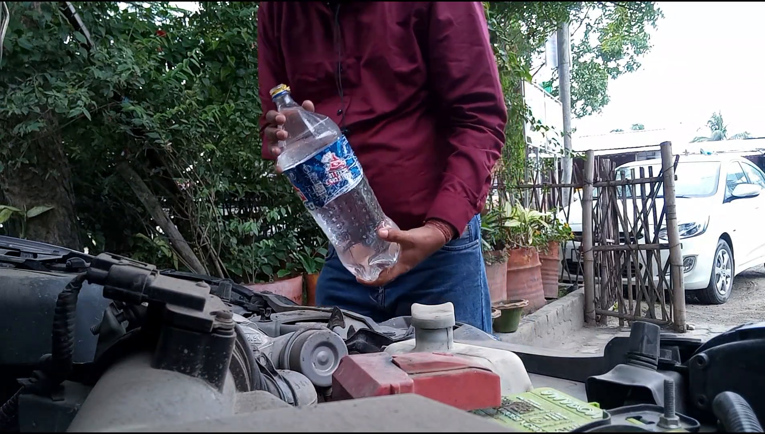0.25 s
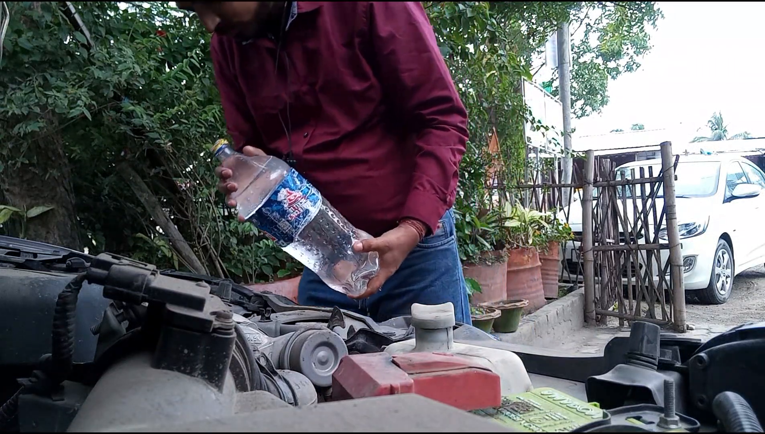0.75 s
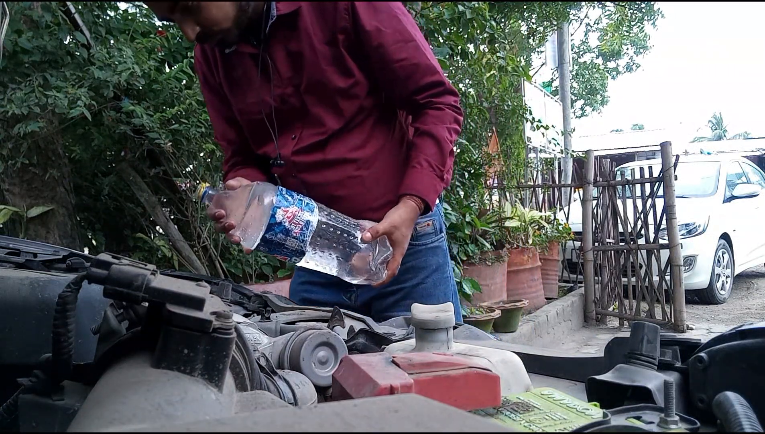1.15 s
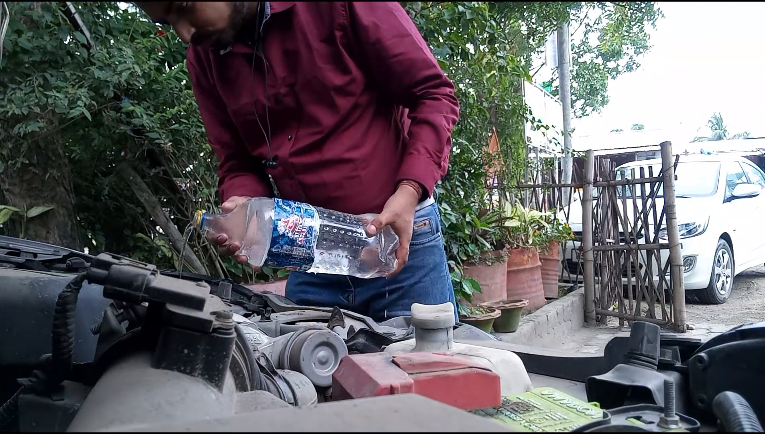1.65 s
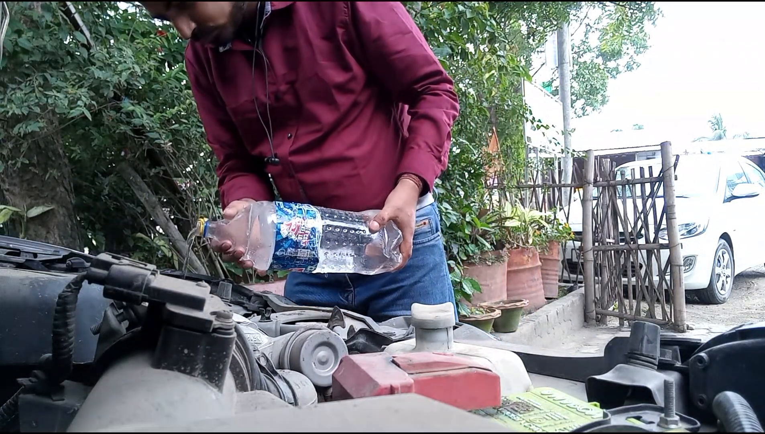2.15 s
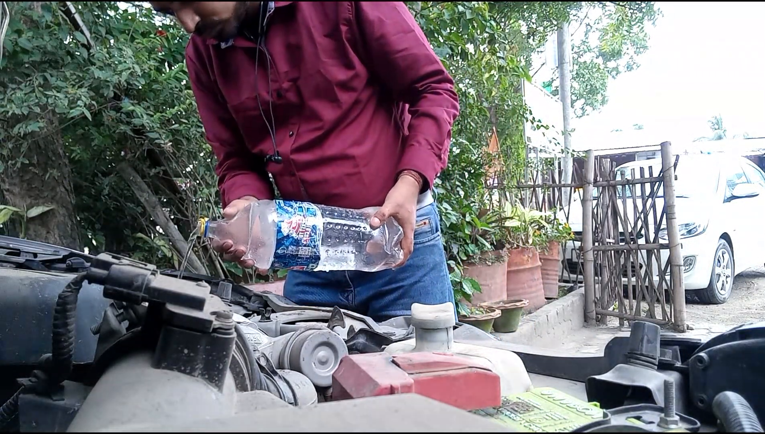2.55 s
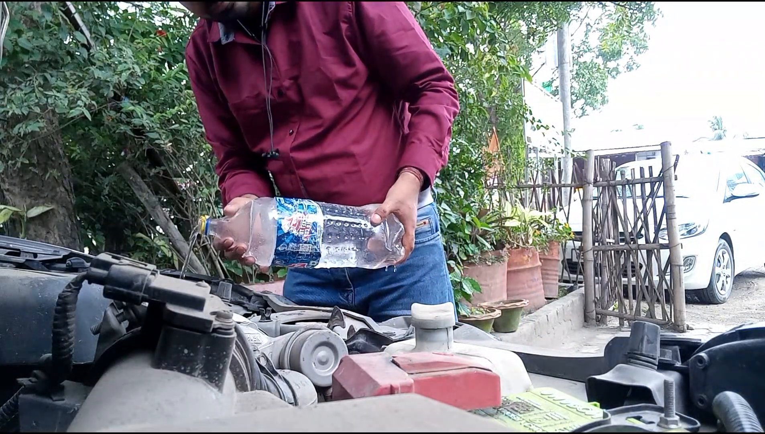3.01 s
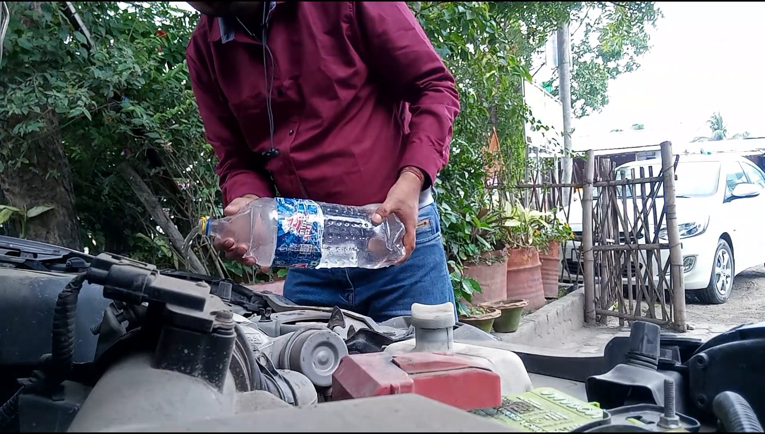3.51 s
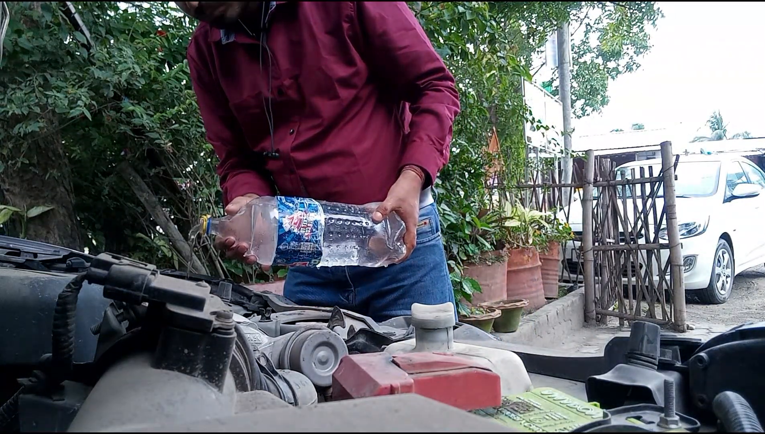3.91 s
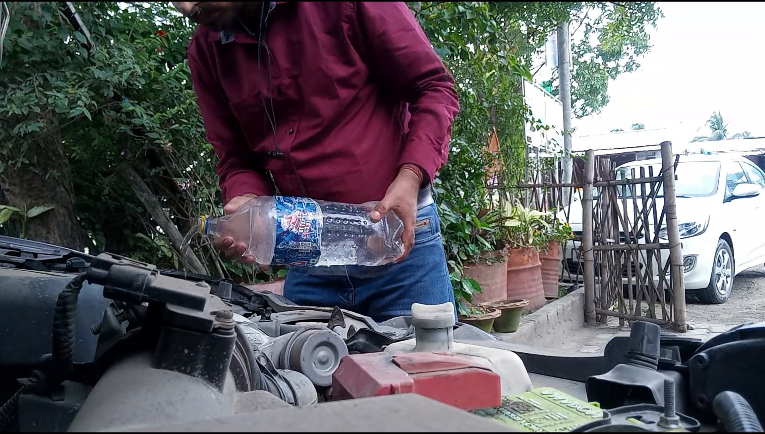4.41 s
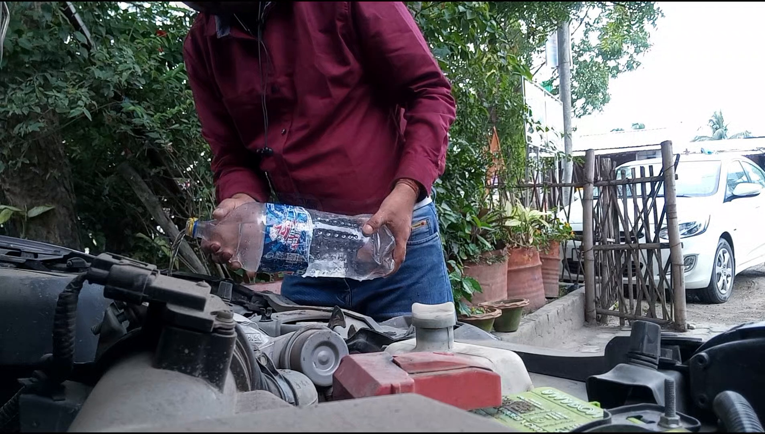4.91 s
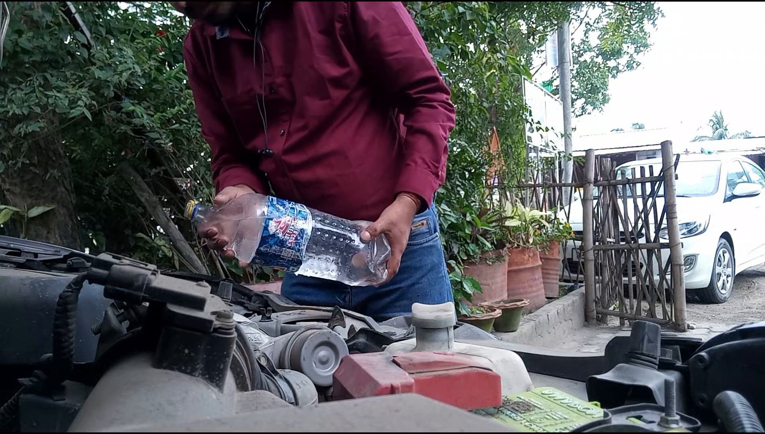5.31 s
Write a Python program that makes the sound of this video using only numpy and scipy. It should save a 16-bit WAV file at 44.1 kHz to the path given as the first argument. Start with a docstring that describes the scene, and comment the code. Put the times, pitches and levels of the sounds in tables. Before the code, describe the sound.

After two quiet garden seconds, hollow bottle glugs, plips and a hard low splash build, then thin out beneath loud bird chirps.

```python
"""Glugging water in a garden

Water glugs unevenly from a plastic bottle into a car's reservoir: air gulps ring the bottle's cavity as pitched
bubbles, short bubbles plip, a few low ones slosh or thump, drops tick, slugs splash as noise bursts through the
reservoir's air modes. Birds whistle and chirp among trees as sliding tones with echoes; insects sing high as
bands of patchy noise. Filtered noise makes the garden's rush and the puffs of wind that brush the microphone."""
import sys
import numpy as np
from scipy import signal
from scipy.fft import rfft, irfft, next_fast_len
from scipy.io import wavfile
from scipy.ndimage import uniform_filter1d, map_coordinates

SR = 44100
rng = np.random.default_rng(int(sys.argv[2]) if len(sys.argv) > 2 else 0)


def bounce(signal):
    """Save signal as a 16-bit WAV file at the path given by the first command-line argument."""
    frames = np.transpose(np.atleast_2d(signal))
    limited = np.clip(frames, -1, 1)
    pcm = np.round(limited * 32767).astype(np.int16)
    wavfile.write(sys.argv[1], SR, pcm)


N = 245284

# garden rush: (time [s], rumble level before gain [dB], treble level before gain [dB])
RUSH = [(0, -79.5, -84.5), (.53, -77.5, -87), (.57, -78.5, -89), (.9, -81, -90.5), (.94, -78.5, -84),
        (1.3, -79, -83.5), (2.4, -82, -90), (3.5, -79, -83), (4.7, -84.5, -82.5), (5.2, -80, -85),
        (5.56, -82, -85.5)]
# garden rush spectrum: (frequency [Hz], relative density [dB])
RUSH_SPECTRUM = [(20, -34), (55, -13), (95, -4.5), (200, -10), (500, -10), (1100, -15), (2100, -9.5),
                 (3400, -9.5), (4400, -14), (5000, -20), (7800, -23), (9700, -24), (10100, -51),
                 (15500, -41.5)]
# wind on the microphone: (middle [s], 1/e width [s], level [dB])
WIND_PUFFS = [(.75, 0.19, -53), (2.79, 0.14, -82), (3.57, 0.028, -63.5), (4.41, 0.13, -76),
              (5.22, .09, -68.5)]
# wind spectrum: (frequency [Hz], relative density [dB])
WIND_SPECTRUM = [(12, -48.5), (20, -3.5), (38, -26), (82, 11.5), (100, -0.5), (140, -22.5), (250, -36),
                 (320, -67), (550, -120)]
# insect choruses: (centre [Hz], width [Hz], resting level [dB], bouts as (middle [s], 1/e width [s], level [dB]))
CHORUSES = [(5667, 330, -79, [(.28, 0.19, -87), (2.8, 0.95, -82), (3.2, 0.24, -79), (3.6, .2, -89),
            (4.0, 0.68, -87)]), (6560, 135.4, -91, [(.3, 0.32, -76.5), (2.0, 0.38, -71.5), (3.1, 0.1, -74),
            (3.75, 0.24, -75.5), (4.55, 0.51, -75.5)]), (7183, 500, -96, [(0, 0.6, -70), (.65, 0.39, -77),
            (1.45, .35, -70), (3.06, .15, -74), (3.5, 0.44, -89), (5.1, 0.91, -81)]),
            (8780, 1330, -72.5, [(.25, 0.86, -72.5), (1.45, 0.53, -69), (2.5, 1, -80.5), (5.56, 0.1, -73)])]
# far bird's calls: (time [s], level [dB])
FAR_CALLS = [(.2, -66.5), (1.549, -69)]
# far bird's phrase: (delay [s], length [s], from [Hz], to [Hz], slide time constant [s], level re call [dB])
FAR_PHRASE = [(0, .2, 1520, 1401, 0.086, -0.5), (0.193, 0.13, 1370, 1508, 0.071, 0.5),
              (0.286, 0.11, 1510, 1673, 0.0207, -1.5)]
# clear whistles, with two lone low notes of the far bird among them (at 1.0 s and 3.03 s): (time [s], length
# [s], from [Hz], to [Hz], slide time constant [s], level [dB])
WHISTLES = [(1.0, 0.45, 1494, 1404, 0.103, -75), (.73, 0.093, 1950, 1936, 0.09, -63),
            (1.19, 0.092, 3230, 3386, 0.12, -53.5), (1.82, 0.081, 4465, 4623, 0.066, -61.5),
            (2.31, 0.135, 3506, 3820, 0.051, -61.5), (3.03, 0.26, 1472, 1428, 0.022, -55.5),
            (4.33, 0.3, 2470, 2489, 0.034, -62.5), (4.9, 0.085, 2760, 2227, 0.024, -45.5),
            (4.99, 0.044, 1930, 1925, 0.026, -52), (5.12, 0.17, 2500, 2506, 0.04, -59.5),
            (5.22, 0.14, 2457, 2525, 0.039, -52), (5.29, 0.056, 1970, 1773, 0.032, -52.5),
            (5.41, 0.12, 2490, 2550, .05, -69)]
# buzzy chirps: (time [s], length [s], from [Hz], to [Hz], slide time constant [s], level [dB])
BUZZY_CHIRPS = [(.55, 0.024, 2830, 3260, 0.032, -62), (.6, 0.063, 3845, 3750, 0.044, -65.5),
                (.71, 0.056, 3850, 3780, .03, -64.5), (.76, .07, 3210, 3240, .04, -65.5),
                (.96, 0.055, 2940, 2640, 0.044, -57), (.97, 0.24, 2560, 2423, 0.026, -65),
                (1.08, 0.076, 2730, 2380, .05, -58), (1.79, 0.085, 3780, 3630, 0.023, -52),
                (1.83, 0.18, 3380, 3270, 0.038, -67), (2.02, 0.11, 3600, 4340, 0.026, -54),
                (2.16, 0.18, 3780, 3525, 0.038, -58), (2.5, 0.19, 5500, 5240, 0.11, -72),
                (2.66, 0.11, 4650, 4283, 0.052, -57.5), (2.77, 0.1, 4200, 3481, 0.12, -55),
                (3.44, 0.17, 3636, 3910, 0.055, -53.5), (4.13, .04, 3150, 3150, 0.036, -68),
                (4.19, 0.54, 3302, 3170, 0.038, -60.5), (4.36, 0.094, 3690, 3700, 0.058, -48),
                (4.37, 0.2, 3180, 3213, 0.051, -51), (4.4, 0.053, 4330, 4440, 0.033, -56),
                (4.55, 0.088, 3006, 3944, 0.043, -41), (4.57, 0.062, 3300, 2880, 0.034, -44),
                (4.57, 0.099, 2854, 2090, 0.043, -47), (4.765, 0.085, 2860, 3850, 0.03, -45.5),
                (4.815, .13, 3800, 3795, 0.031, -37.5), (4.85, 0.054, 3620, 2530, 0.028, -46),
                (4.86, .1, 3284, 3140, 0.028, -51.5), (4.96, 0.15, 4494, 4420, 0.041, -65),
                (4.98, 0.11, 3750, 3800, 0.054, -56), (4.99, .06, 4850, 5340, .04, -59),
                (5.095, 0.08, 3060, 3740, 0.036, -42), (5.14, 0.15, 3785, 3807, 0.039, -47),
                (5.14, 0.059, 4740, 4970, 0.021, -66), (5.2, 0.15, 2950, 2076, .08, -58.5),
                (5.29, 0.14, 3810, 3700, 0.073, -54.5), (5.42, 0.12, 4010, 3004, 0.13, -50.5)]
# air gulps: (envelope peak time [s], level [dB], cavity pitch [Hz], length before the rise cap [s])
AIR_GULPS = [(2.067, -38, 434, 0.011), (2.094, -48, 440, 0.0073), (2.112, -41, 438, 0.011),
             (2.431, -45.5, 465, 0.0055), (2.472, -43, 483.6, 0.04), (2.498, -45.5, 503.5, 0.018),
             (2.574, -32.5, 476, 0.029), (2.603, -37.5, 475, 0.0073), (2.618, -40.5, 496, 0.019),
             (2.648, -44.5, 501, 0.041), (2.775, -51.5, 460.6, 0.049), (2.815, -30.5, 476, .026),
             (2.845, -38, 493.1, 0.029), (2.885, -35.5, 508.3, 0.018), (2.91, -40, 508.2, 0.017),
             (3.006, -38.5, 444, 0.014), (3.05, -48.5, 457, 0.0046), (3.187, -44, 454.7, 0.016),
             (3.213, -26.5, 464.3, .014), (3.232, -26.5, 470.2, 0.015), (3.264, -39.5, 484.3, 0.04),
             (3.318, -45, 424, 0.008), (3.345, -41.5, 456, 0.054), (3.39, -34, 441.6, 0.027),
             (3.447, -43, 477.7, 0.02), (3.468, -34, 450, 0.012), (3.499, -35, 424.4, 0.029),
             (3.532, -42, 414.3, 0.025), (3.568, -11, 456, 0.0073), (3.602, -36.5, 447.2, 0.015),
             (3.647, -41.5, 494, 0.015), (3.716, -33.5, 427.8, 0.059), (3.78, -22.5, 432, 0.0056),
             (3.792, -19.5, 419, 0.0075), (3.805, -39.5, 417, 0.017), (3.87, -30.5, 453, 0.0054),
             (3.883, -29.5, 424, 0.012), (3.896, -29, 493, 0.02), (3.912, -29.5, 437.3, 0.023),
             (4.02, -40.5, 435.8, 0.037), (4.093, -39, 452, 0.019), (4.179, -25, 455, 0.012),
             (4.204, -32.5, 448.5, 0.014), (4.266, -32, 493.4, 0.016), (4.24, -46, 484, 0.02),
             (4.295, -46, 493, 0.025), (4.33, -44, 477.5, .025), (4.458, -43.5, 528, 0.025),
             (4.489, -39, 517.6, 0.035), (4.637, -35, 560, 0.0088), (4.671, -26.5, 533.6, 0.012),
             (4.893, -42, 524, 0.008), (4.906, -40.5, 648, 0.011), (4.959, -42, 610, 0.0053),
             (5.53, -34.5, 434, 0.017), (5.545, -37, 470, 0.0049)]
# short bubbles, slosh blips and a low thump: (envelope peak time [s], level [dB], pitch [Hz])
SHORT_BUBBLES = [(.335, -60, 650), (.425, -59, 349), (.52, -63, 560), (.655, -62.5, 993),
                 (2.207, -46, 1081), (2.432, -54, 1674), (2.574, -52.5, 1610), (2.647, -53.5, 2000),
                 (2.701, -57, 4490), (2.73, -56, 1610), (2.759, -55, 1064), (2.77, -49.5, 5770),
                 (2.776, -58.5, 2380), (2.843, -42, 1660), (2.912, -49, 1587), (2.944, -45, 1070),
                 (2.946, -50, 1650), (2.96, -52.5, 5800), (3.128, -49.5, 1610), (3.187, -54, 5220),
                 (3.195, -49.5, 1050), (3.208, -37.5, 1690), (3.21, -43, 2092), (3.2255, -41, 3775),
                 (3.255, -49, 1540), (3.316, -46, 3093), (3.333, -45, 1640), (3.396, -52, 1540),
                 (3.4, -38.5, 1067), (3.538, -46, 1090), (3.567, -25, 953), (3.568, -46, 4290),
                 (3.581, -42.5, 1630), (3.582, -39, 1015), (3.595, -49, 1680), (3.621, -48, 4300),
                 (3.701, -49, 1299), (3.728, -44, 1090), (3.787, -45, 3834), (3.797, -45, 977),
                 (3.8051, -42, 5980), (3.814, -48, 920), (3.877, -42.5, 1643), (3.91, -46, 1260),
                 (3.908, -43.5, 1530), (3.912, -50, 3030), (3.954, -45, 2705), (3.994, -53.5, 4006),
                 (4.001, -51, 1674), (4.069, -37.5, 1020), (4.145, -46.5, 3150), (4.188, -38.5, 1030),
                 (4.21, -48, 1185), (4.227, -47.5, 985), (4.303, -45, 3266), (4.315, -46.5, 1705),
                 (4.384, -49, 1328), (4.482, -43.5, 1844), (4.663, -38, 1363), (4.665, -44, 1167),
                 (4.68, -53, 1486), (4.871, -52.5, 2050), (4.891, -50, 1646), (5.014, -52.5, 1943),
                 (5.039, -57.5, 1400), (5.101, -50.5, 1600), (5.2, -59.5, 218.7)]
# slugs of water landing: (time [s], level [dB], low body trim [dB], reservoir ring trim [dB])
SLUGS = [(0.6484, -68, 2, -2), (2.0506, -67, 8.5, 1.5), (2.0935, -58, -1, -9), (2.4294, -83, -3, 4.5),
         (2.847, -63, -21, -11), (3.1798, -62, -24, -6), (3.2104, -63.5, -23, 9.5), (3.3256, -65, -19, 9.5),
         (3.3894, -71, 8, -19), (3.5619, -40.5, 15.5, -12.5), (3.589, -59.5, -2, -2),
         (3.6177, -52, -18, -26), (3.703, -62, -15, -0.5), (3.792, -42, -0.5, -39), (3.822, -57, 0, -11),
         (3.9097, -63, -2, -2), (3.993, -61, -5, -0.5), (4.1788, -60, 2, -5.5), (4.3174, -71, 2, 3.5),
         (4.4754, -72, 8, 10), (4.6459, -73, 6, 18.5), (4.6712, -74, 8, 14), (4.887, -62.5, 14.5, 1),
         (4.9556, -61, 6, -8), (5.188, -65, 6, -14)]
# reservoir air modes: (frequency [Hz], half-power width [Hz], level [dB])
AIR_MODES = [(1081, 36, 2), (1628, 200, 1), (2310, 2700, -15.5), (3137, 110, -0.5), (3860, 76, -3),
             (4396, 81, -4), (6100, 400, -23.5), (6440, 430, -16)]
# drop ticks: (time [s], level before layer gains [dB], bead pitch [Hz], mist trim [dB])
DROP_TICKS = [(1.7816, -41, 7140, -22), (2.285, -47, 7070, -9), (2.4143, -47.5, 8600, -40),
              (2.52, -45, 8670, -35), (2.765, -54, 7800, -40), (2.8593, -52, 8150, -24),
              (2.923, -51, 7080, -25.5), (3.0034, -43, 7430, -30.5), (3.1485, -51.5, 7110, -22),
              (3.2305, -49, 6825, -18.5), (3.2858, -51, 7740, -15.5), (3.313, -50.5, 8460, -30),
              (3.357, -43, 6670, -24), (3.3799, -52.5, 6230, -26.5), (3.572, -50.5, 6500, -16.5),
              (3.6824, -57, 7980, -18), (3.7, -44, 6960, -21.5), (3.7673, -49.5, 9240, -16),
              (3.8023, -42, 6770, -23), (4.05, -63.5, 8500, 6.5), (4.0889, -42, 7030, -37),
              (4.171, -46.5, 8420, -29), (4.26, -48, 7060, -38), (4.548, -58, 6880, -32),
              (4.5976, -50, 6850, -35.5), (4.645, -53.5, 8350, -25), (4.8685, -61, 7400, -33),
              (5.0394, -61, 6740, -22), (5.191, -69.5, 8140, 1.5), (5.365, -61.5, 7530, -1.5),
              (5.48, -53, 7740, -26)]
# running stream: (time [s], cavity hum level [dB], gurgle level [dB])
FLOW = [(1.95, -82, -80), (2.15, -83, -80), (2.38, -69, -74), (2.6, -48.5, -68.5), (2.69, -83, -67.5),
        (2.76, -51, -67.5), (2.91, -53.5, -68.5), (3.09, -55, -69.5), (3.38, -48, -62.5), (3.6, -61, -72.5),
        (3.77, -54.5, -68.5), (3.91, -50, -59.5), (4.0, -53, -71.5), (4.2, -66, -69), (4.26, -50, -61.5),
        (4.45, -80, -82), (4.71, -85, -92), (5.03, -83.5, -77), (5.4, -99.5, -99), (5.56, -83, -67)]

TOP_HZ = 15550
CALM_WIND_DB = -82.5
NOTE_SWELL_SHARE, NOTE_RELEASE_S = 0.37, 0.01  # a note swells for this share of its slide
LEAD_SAMPLES = 1600  # ahead of a bubble's peak
GULP_RISE_SHARE, LONGEST_RISE_S = 0.48, 0.019  # part of a gulp's length before its peak
BUBBLE_RISE_1KHZ_S, BUBBLE_FALL_1KHZ_S, SHORTENING = 0.0034, 0.0054, 0.13  # power of pitch that shortens
SPRAY_DB, BODY_DB, MIST_DB, RING_DB = -9, -4.5, -30.5, 4.5  # splash layer gains
PLINK_DB = -3.5  # re the gurgle


def amp(db):
    """Decibels to linear gain."""
    return 10 ** (np.asarray(db) / 20)


def unit(x):
    """Scale to rms 1."""
    return x / np.sqrt(np.mean(x ** 2) + 1e-20)


def curves(rows):
    """One value per sample for each column after the time."""
    time_s, *columns = np.transpose(rows)
    return [np.interp(np.arange(N) / SR, time_s, column) for column in columns]


def wobble(rate_hz, size=N):
    """Smooth random curve, rate_hz knots a second."""
    knots = rng.standard_normal(size // 64 + 8)
    return map_coordinates(knots, [np.arange(size) * rate_hz / SR], mode="mirror")


def filtered(x, response):
    """Multiply the spectrum of x by a response of frequency."""
    m = next_fast_len(len(x) + 8192)
    return irfft(rfft(x, m) * response(np.fft.rfftfreq(m, 1 / SR)), m)[:len(x)]


def hiss(response):
    """Filtered white noise of rms 1."""
    return unit(filtered(rng.standard_normal(N), response))


def colour(points):
    """(frequency [Hz], level [dB]) points as a gain, interpolated on a log axis."""
    f, db = np.transpose(points)
    return lambda hz: amp(np.interp(np.log(hz + 1), np.log(f + 1), db))


def band(centre_hz, width_hz, order=2):
    """Pass band, bell-shaped or, at a higher order, flat-topped."""
    return lambda hz: np.exp(-.5 * ((hz - centre_hz) / width_hz * 2) ** order)


def patchy(depth_db, size=(5, 12)):
    """White noise with time-frequency patches of random gain, size (bins, frames)."""
    z = signal.stft(rng.standard_normal(N + 512), nperseg=512)[2]
    field = rng.standard_normal(z.shape)
    field = uniform_filter1d(field, size[0], 0)
    field = uniform_filter1d(field, size[1], 1)
    return signal.istft(z * amp(depth_db * unit(field)), nperseg=512)[1][:N]


def add(out, time_s, sound):
    """Mix a sound into out at time_s."""
    part = out[max(round(time_s * SR), 0):][:len(sound)]
    part += sound[:len(part)]


def swell(t, t60_s, rise_s):
    """Soft start, exponential decay, peak 1."""
    shape = (1 - np.exp(-t / rise_s)) ** 2 * amp(-60 * t / t60_s)
    return shape / shape.max()


def bouts(rest_db, rows, order=2):
    """Gain that rests at rest_db and swells for each (middle [s], 1/e width [s], level [dB])."""
    t = np.arange(N) / SR
    swells = (amp(db) * np.exp(-np.abs(2 * (t - middle_s) / width_s) ** order) for middle_s, width_s, db in rows)
    return amp(rest_db) + sum(swells)


def echoes(x, t60_s, wet_db):
    """Add a diffuse noise tail that builds up over some milliseconds, then decays."""
    t = np.arange(round(SR * .6)) / SR
    tail = rng.standard_normal(len(t)) * amp(-60 * t / t60_s) * (1 - np.exp(-t / 0.0068))
    return x + amp(wet_db) * signal.fftconvolve(x, tail / np.linalg.norm(tail))[:N]


def air():
    """Garden rush with low and high parts drifting apart, lumpy wind and the microphone's faint hiss."""
    rumble_db, treble_db = curves(RUSH)
    spectrum = colour(RUSH_SPECTRUM)
    low = lambda hz: 1 / (1 + (hz / 1500) ** 4)
    rumble = amp(rumble_db + 9.0) * hiss(lambda hz: spectrum(hz) * low(hz))
    treble = unit(filtered(patchy(2.5), lambda hz: spectrum(hz) * (1 - low(hz))))
    wind = unit(amp(0.68 * wobble(24)) * hiss(colour(WIND_SPECTRUM)))
    wind *= bouts(CALM_WIND_DB, WIND_PUFFS, order=4)
    self_noise = amp(-91) * hiss(lambda hz: hz > 9000)
    return rumble + amp(treble_db + 12) * treble + self_noise + wind


def insects():
    """Each chorus is a band of flickering, patchy noise, as of many thin voices, that swells in bouts."""
    out = np.zeros(N)
    for centre_hz, width_hz, rest_db, rows in CHORUSES:
        voices = unit(filtered(patchy(5.1, size=(2, 10)), band(centre_hz, width_hz, order=4)))
        out += bouts(rest_db, rows) * amp(0.92 * wobble(14)) * voices
    return out


def sing(notes, rough, flutter_hz, breaks_db, sag, fade_db, octave_db):
    """Sliding, fading tones whose strength flutters and breaks up, the pitch sagging in quick dips."""
    out, dips = np.zeros(N), 1 - sag * wobble(90) ** 2
    for time_s, length_s, from_hz, to_hz, slide_s, db in notes:
        t = np.arange(0, length_s, 1 / SR)
        edge = np.clip(np.minimum(t / (NOTE_SWELL_SHARE * slide_s), (length_s - t) / NOTE_RELEASE_S), 0, 1)
        slide_hz = to_hz + (from_hz - to_hz) * np.exp(-t / slide_s)
        pitch_hz = slide_hz * dips[np.minimum((time_s + t) * SR, N - 1).astype(int)]
        phase = 2 * np.pi * np.cumsum(pitch_hz) / SR
        tone = np.sin(phase) + amp(octave_db) * np.sin(2 * phase)
        add(out, time_s, amp(db - fade_db * t / length_s) * edge * tone)
    flutter = 1 - rough + rough * wobble(flutter_hz)
    return out * flutter * amp(breaks_db * wobble(35))


def birds():
    """A far bird, clear whistles and buzzy chirps, blurred by echoes among the trees."""
    phrases = [(call_s + delay_s, *shape, call_db + note_db)
               for call_s, call_db in FAR_CALLS for delay_s, *shape, note_db in FAR_PHRASE]
    far = sing(phrases, 0.31, 70, breaks_db=4, sag=0.0079, fade_db=1.5, octave_db=-36)
    clear = sing(WHISTLES, 0.13, 200, breaks_db=1.3, sag=.008, fade_db=9.5, octave_db=-40)
    buzzy = sing(BUZZY_CHIRPS, 0.53, 300, breaks_db=1.5, sag=0.032, fade_db=10.5, octave_db=-25)
    return echoes(far + clear + buzzy, 0.099, -0.3)


def bubble(hz, rise_s, fall_s, climb, rough):
    """Swells and dies (times to -6 dB) while its pitch climbs; churning water shakes it."""
    t = np.arange(-LEAD_SAMPLES, 2 * LEAD_SAMPLES) / SR
    shape = np.where(t < 0, amp(-6 * (t / rise_s) ** 2), amp(-6 * np.abs(t / fall_s) ** 1.4))
    shake = 1 + rough * wobble(hz / 8, size=len(t))
    cycles = hz * (t + climb * t * t / max(fall_s, .002) / 2)
    return shape * shake * np.sin(2 * np.pi * cycles)


def ring(rows, climb, rough):
    """Sum of bubbles, rows (peak time [s], level [dB], pitch [Hz], rise [s], fall [s])."""
    out = np.zeros(N + LEAD_SAMPLES)
    for time_s, db, hz, rise_s, fall_s in rows:
        add(out, time_s, amp(db) * bubble(hz, rise_s, fall_s, climb, rough))
    return out[LEAD_SAMPLES:]


def bubbles():
    """Air gulps ring the bottle's cavity; short bubbles, slosh blips and a low thump are rougher."""
    gulps, short = [], []
    for time_s, db, hz, length_s in AIR_GULPS:
        rise_s = min(GULP_RISE_SHARE * length_s, LONGEST_RISE_S)
        gulps.append((time_s, db, hz, rise_s, (1 - GULP_RISE_SHARE) * length_s))
    for time_s, db, hz in SHORT_BUBBLES:
        scale = (1000 / hz) ** SHORTENING  # shorter the higher the pitch
        short.append((time_s, db, hz, BUBBLE_RISE_1KHZ_S * scale, BUBBLE_FALL_1KHZ_S * scale))
    return ring(gulps, climb=0.027, rough=0.12) + ring(short, climb=0.012, rough=0.41)


def modes(hz):
    """Resonant response of the reservoir's air modes, alternating in sign."""
    return sum((-1) ** k * amp(db) * 1j * hz * width / (centre * centre - hz * hz + 1j * hz * width)
               for k, (centre, width, db) in enumerate(AIR_MODES))


def splashes():
    """A landing slug is a ragged noise burst: low body, reservoir modes, spray and mist on top."""
    layers, shape = np.zeros((4, N)), swell(np.arange(8192) / SR, 0.053, 0.013)
    for time_s, db, body_db, ring_db in SLUGS:
        gains_db = (SPRAY_DB, body_db + BODY_DB, MIST_DB, ring_db + RING_DB)
        for layer, gain_db in zip(layers, gains_db):
            add(layer, time_s - .003, amp(db + gain_db) * shape)
    spray, body, mist, ringing = layers
    ragged = amp(5.13 * wobble(150))
    clusters = patchy(5, size=(7, 2))  # droplets land in clumps of pitch
    spray = spray * unit(filtered(clusters, band(4470, 5100)))
    mist = mist * hiss(band(12600, 5800, order=4))
    ringing = ringing * hiss(lambda hz: modes(hz) + 0.098 * band(2200, 3500)(hz))
    return ragged * (spray + mist + ringing) + body * hiss(band(700, 460))


def ticks():
    """A drop's tick: a tiny bubble in a burst of spray and mist."""
    t = np.arange(2048) / SR
    spray, mist = np.zeros(N), np.zeros(N)
    spray_shape, mist_shape = swell(t, 0.063, 0.00053), swell(t, 0.031, .003)
    for time_s, db, _, mist_db in DROP_TICKS:
        add(spray, time_s, amp(db - 13.0) * spray_shape)
        add(mist, time_s, amp(db + mist_db - 10) * mist_shape)
    beads = [(time_s + 0.0031, db - 7, hz, .0015, .004) for time_s, db, hz, _ in DROP_TICKS]
    noise = spray * hiss(band(8050, 2300)) + mist * hiss(band(13000, 3600, order=4))
    return ring(beads, climb=0.017, rough=0.17) + noise


def stream():
    """Running water hums the cavity at the gulps' pitch and rattles the reservoir's modes with droplets."""
    hum_db, gurgle_db = curves(FLOW)
    pitch_hz, = curves([(time_s, hz) for time_s, _, hz, _ in AIR_GULPS])
    gate = np.clip((np.arange(N) / SR - 1.97) / 0.054, 0, 1)
    hum = unit(wobble(150) * np.sin(2 * np.pi * np.cumsum(pitch_hz) / SR))
    drops = amp(3.6 * wobble(45) + 0.95 * wobble(400)) * patchy(0.77)
    gurgle = unit(filtered(drops, modes))
    running = gate * (amp(hum_db) * hum + amp(gurgle_db) * gurgle)
    return running + plinks(gurgle_db + PLINK_DB) + spatter(gurgle_db)


def plinks(flow_db):
    """Chance droplets and bubbles near the reservoir's modes, louder as the flow swells."""
    when, which, detune, size = rng.random((4, 220))
    time_s = 2.3 + 2.4 * when
    mode_hz = np.array(AIR_MODES)[(which * len(AIR_MODES)).astype(int), 0]
    hz = mode_hz * (1 + 0.45 * (detune - .5))
    db = flow_db[(time_s * SR).astype(int)] + 13 * size ** 3.2 - 0.84 * np.log2(hz / 1000)
    return ring(zip(time_s, db, hz, 4.6 / hz, 12.0 / hz), climb=0.015, rough=.2)


def spatter(flow_db):
    """Fine treble droplets and a crackling mist above them, louder as the flow swells."""
    when, pitch, size = rng.random((3, 160))
    time_s, hz = 2.3 + 2.3 * when, 3000 * 3.2 ** pitch
    mist = amp(flow_db - 24.5 + 5 * wobble(60)) * hiss(band(12600, 5800, order=4))
    db = flow_db[(time_s * SR).astype(int)] - 0.5 + 12 * size ** 3.4
    return mist + ring(zip(time_s, db, hz, 7 / hz, 16 / hz), climb=0.0084, rough=0.49)


def scene():
    """Water with its short echoes, over birds, insects and air."""
    water = echoes(bubbles() + splashes() + ticks() + stream(), 0.11, -8)
    return (air() + insects() + birds() + water)[None]


def record(dry):
    """The microphone keeps nothing above its band limit."""
    return filtered(dry[0], lambda hz: hz < TOP_HZ)[None]


dry = scene()
out = record(dry)
bounce(out)
```